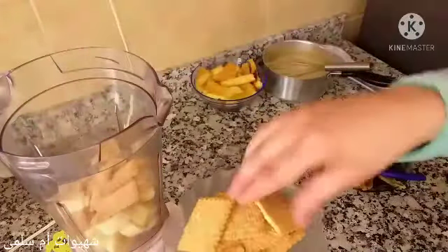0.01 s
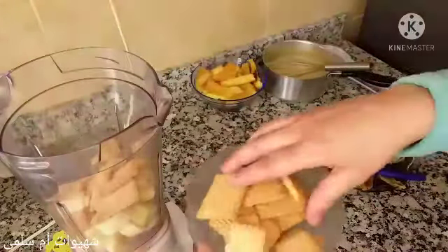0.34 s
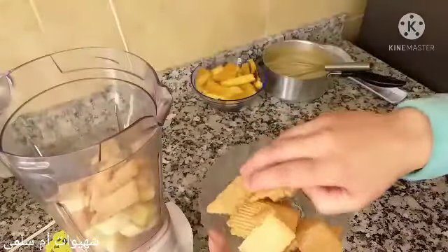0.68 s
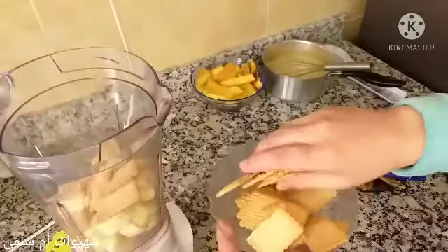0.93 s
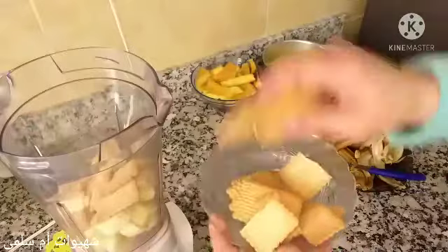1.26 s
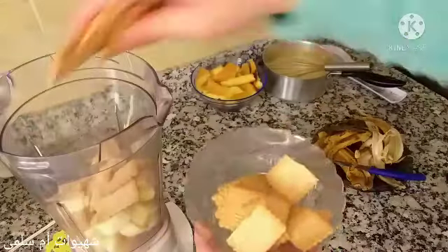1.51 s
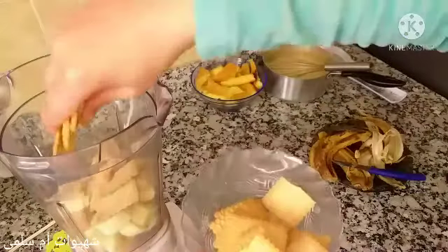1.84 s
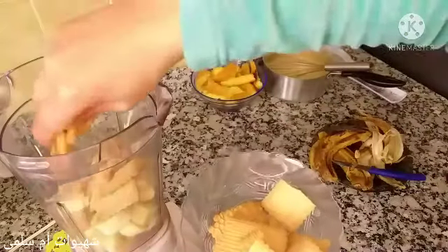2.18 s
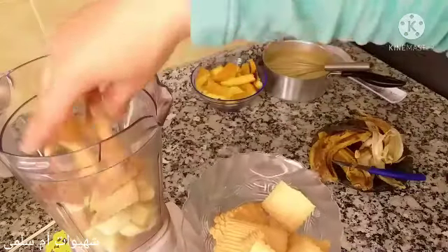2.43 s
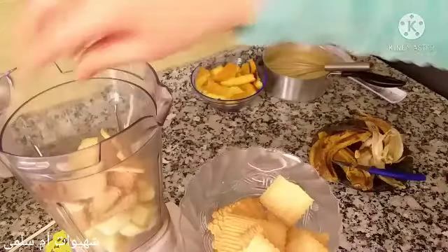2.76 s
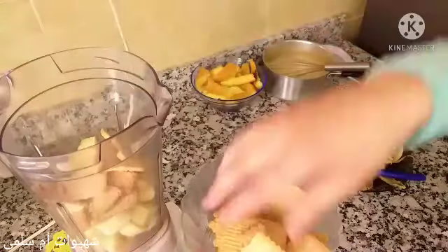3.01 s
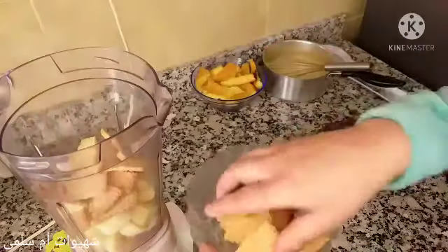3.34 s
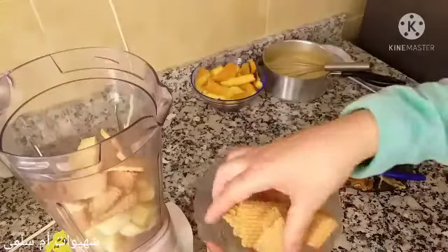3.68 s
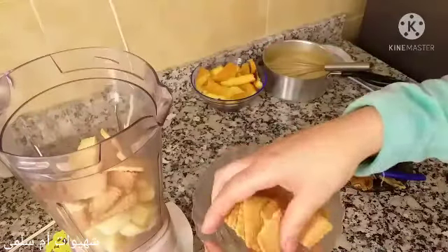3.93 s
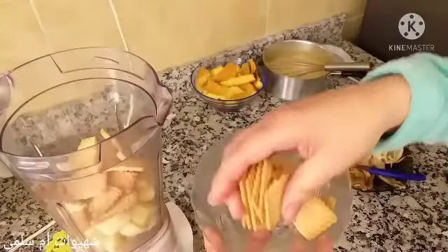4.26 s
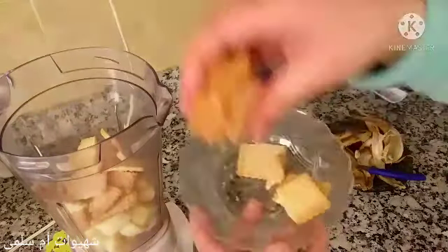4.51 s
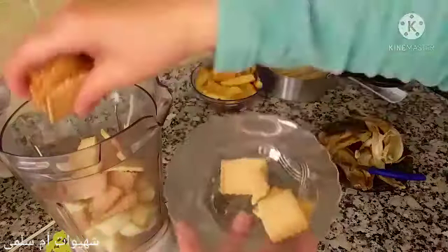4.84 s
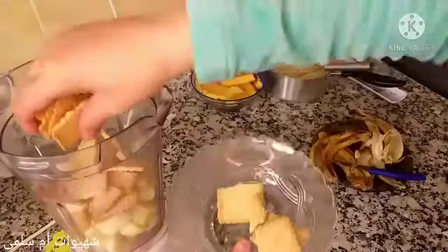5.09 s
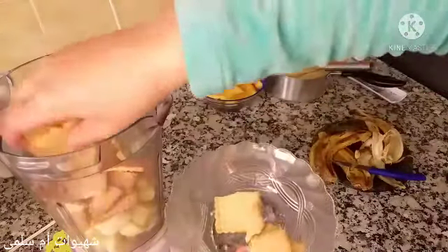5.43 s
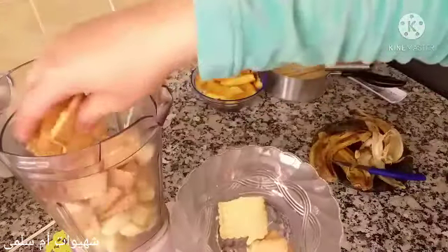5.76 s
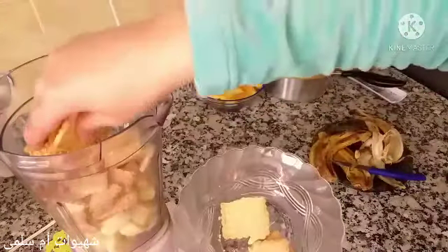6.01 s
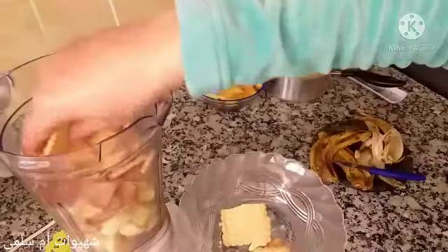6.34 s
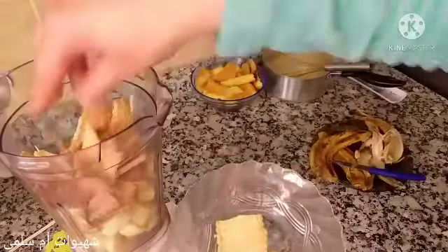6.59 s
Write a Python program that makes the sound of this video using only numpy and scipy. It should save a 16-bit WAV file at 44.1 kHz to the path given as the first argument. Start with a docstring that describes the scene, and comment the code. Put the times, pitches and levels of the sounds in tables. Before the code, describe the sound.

Dry biscuits softly slide and bump on a glass plate, with one bright clink at about 0.9 seconds. From 1.6 to 2.3 seconds they snap in a hand in a quick run of crisp, crumbly cracks. The pieces clatter and scrape into a plastic blender jar from 2.4 to 2.7 seconds, with soft low thumps from its base. Between 3.1 and 4.5 seconds more biscuits are gathered, with quiet rasping and faint ticks of glass. Snapping resumes around 4.7 seconds, with a hollow knock on the jar near 5. From 5.5 seconds pieces crunch, scrape and fall, striking the ringing plastic at 5.7 and, loudest of all, at 6.2 seconds. A few smaller bits settle until about 6.7 seconds. Everything sounds close, with a short tiled kitchen echo over a low steady hush and a faint rumble.

```python
"""Dry biscuits snap in a hand and fall into a plastic blender jar, twice, gathered from a glass plate.
Each snap or landing is a burst of tiny fractures, and rough faces rasp as they rub.
The jar's shell rings, its wall knocks and its base thumps; the plate clinks.
A tiled kitchen echoes, over a low hush and a faint rumble."""
import sys
import numpy as np
from scipy import signal
from scipy.fft import rfft, irfft
from scipy.io import wavfile

SR = 44100
rng = np.random.default_rng(int(sys.argv[2]) if len(sys.argv) > 2 else 0)


def materialize(psi):
    """Save the field psi as 16-bit PCM at rate SR to the path in sys.argv[1].

    A 1-D psi becomes a single channel; in a 2-D psi each row is a channel.
    """
    bounded = np.clip(np.atleast_2d(psi).T, -1, 1)
    quanta = np.round(bounded * 32767).astype(np.int16)
    wavfile.write(sys.argv[1], SR, quanta)


N = 294147
CLICK_TAPS = 1024

# Breaks: (time [s], level [dB], bass [dB], treble [dB], crumble [s], resonance [Hz])
SNAPS = [(1.584, -31, -5, 2.5, 0.0057, 3200), (1.603, -37.5, 2, -2, 0.0076, 7450),
         (1.7075, -31.5, -1, -7, 0.01, 3050), (1.7116, -28.5, 1, 8, 0.0023, 4670),
         (1.8485, -44, -8, 6, 0.003, 7600), (1.890, -30.5, -4, 7, 0.0049, 7100),
         (1.928, -33.5, 4, 5.5, 0.0078, 5150), (2.024, -40.5, 6, -3, 0.0065, 1500),
         (2.042, -31.5, 4.5, 3.5, 0.0078, 2310), (2.118, -36, 4, 6.5, 0.0068, 5500),
         (2.1875, -33, 0.5, 3.5, 0.0085, 5900), (2.217, -57, 0, -11, 0.0036, 2600),
         (2.295, -40.5, 1, 1, 0.009, 2400), (4.679, -49, 1.5, -2.5, 0.0034, 2320),
         (4.736, -44.5, 2, -7, 0.0036, 2560), (4.842, -29.5, -4, -1, 0.0012, 5170),
         (4.905, -32, -9, 6.5, .003, 3570), (4.946, -37, 9, -13, 0.0063, 4500),
         (4.957, -30, 10.5, 4.5, 0.0023, 2460), (5.010, -38, 5, 10, .002, 6100),
         (5.135, -41, 6.5, 6, .002, 3900), (5.174, -42, -6, -1, 0.0045, 7200),
         (5.398, -47, -4, 0, 0.0044, 7600), (5.955, -35.5, -4, -7, 0.0023, 1600),
         (5.977, -35.5, 12, -9, 0.0024, 3500), (6.005, -31.5, -2, 2, 0.001, 3500),
         (6.1315, -25.5, 5, 1.5, 0.0023, 3530), (6.155, -26, 12.5, 12, 0.0061, 1520),
         (6.225, -37, 7, -4, 0.0017, 1600)]
# Grinding of the stack: (start [s], length [s], level [dB], bass [dB])
SQUEEZES = [(1.83, .13, -42, -0.5), (1.98, 0.19, -54, 2), (2.2, 0.14, -42, -0.5), (2.4, .15, -38.5, 2),
            (2.58, 0.052, -45.5, 17.5), (4.79, .02, -49, 5), (4.885, 0.023, -43, 12),
            (5.02, 0.12, -48.5, -2), (5.25, 0.086, -57, 9), (5.35, 0.051, -48.5, -6)]
# Fracture spectrum in the hand: (frequency [Hz], level [dB])
SNAP_COLOUR = [(100, -53.5), (450, -12), (800, -21.5), (1400, -11), (2300, -7.5), (3600, -1), (5200, -3),
               (7200, -2), (8700, -18.5), (10500, -8.5), (15500, -10)]


def snapping():
    """Biscuits grind and crack between the fingers at the jar's mouth."""
    crunch = gain_of(-0.5) * bursts(SNAPS, SNAP_COLOUR, crack=2.06, per_s=7000, spread_db=2.5, lift_db=7)
    crunch += rasp(SQUEEZES, SNAP_COLOUR, level_db=-2.5, treble_db=-2.5, per_s=2500, spread_db=1.5,
                   catches_per_s=38, catch_db=14, press_s=0.0044)
    return kitchen(crunch, near_db=-3, tail_db=-3) + gain_of(-17) * jar_resonance(crunch)


# Landings: (time [s], level [dB], bass, treble [dB before shelf_scale], crumble [s before stretch],
# resonance [Hz])
DROPS = [(2.387, -20.5, 12, -7, 0.0035, 2880), (2.422, -27, 16, 10, 0.0014, 6600),
         (2.435, -25, 4, 6, 0.0029, 4200), (2.466, -24, -12, -2, 0.0028, 7450),
         (2.472, -21.5, 2, 11, 0.00047, 3900), (2.480, -22.5, 21, -5, 0.012, 1170),
         (2.5095, -25, 23, -4, 0.0026, 3000), (2.549, -29, 5, -5, 0.014, 2300),
         (2.588, -29, 24, -22, 0.0036, 1430), (2.593, -22, 11, -14, 0.0017, 1610),
         (2.686, -27.5, 4, 7, 0.0047, 2200), (5.515, -36.5, -21, 27, 0.004, 3880),
         (5.714, -24.5, 12, 3, 0.02, 1810), (5.7205, -32.5, 22, -12, .007, 1730),
         (5.738, -35, 25, 7, 0.0033, 1400), (5.765, -29, 22, 2, .004, 2220),
         (5.813, -29.5, 18, -9, 0.013, 4240), (5.858, -23, 3, 5.5, 0.0038, 4000),
         (6.161, -15.5, -3, -3, 0.0061, 7900), (6.174, -16.5, 0, -5, 0.0044, 3300),
         (6.1856, -11.5, -9, -15, 0.0055, 2850), (6.192, -16.5, 11, -16, 0.0086, 1660),
         (6.237, -19, 4, -10, 0.0027, 8100), (6.371, -33, -17, -15, 0.0025, 4280),
         (6.428, -35.5, -10, -24, 0.0061, 5100), (6.505, -32, 18, 8, 0.0042, 1860),
         (6.610, -31.5, 13, 11, 0.0039, 4440), (6.659, -35.5, 37, 15, 0.0098, 5800)]
# Strokes along wall and pile: (start [s], length [s], level [dB], bass [dB])
SCRAPES = [(2.35, 0.014, -40, 19.5), (2.44, 0.034, -28, 15), (5.41, 0.16, -50.5, 3.5), (5.5, 0.089, -37, 7),
           (5.57, 0.065, -34, 7.5), (5.67, 0.031, -34, 9), (5.71, 0.039, -27.5, -7), (5.79, 0.047, -37, 1),
           (5.87, 0.13, -42, 14), (6.02, 0.13, -45, 14), (6.135, 0.12, -26.5, 2), (6.27, 0.097, -38.5, 11),
           (6.4, 0.24, -43, 13), (6.505, 0.056, -35, 12), (6.57, .1, -45.5, -13)]
# Fracture spectrum in the jar: (frequency [Hz], level [dB])
DROP_COLOUR = [(100, -29.5), (280, -24), (460, -11.5), (720, -15.5), (1100, -6.5), (1700, -4), (2700, 4),
               (4200, 0.5), (5500, -1.5), (7200, -3.5), (8700, -21.5), (11000, -16), (15500, -21)]


def landing():
    """Pieces hit and scrape the jar and the pile in it."""
    crunch = gain_of(-3.5) * bursts(DROPS, DROP_COLOUR, crack=0.52, per_s=7600, spread_db=0, lift_db=8,
                                    stretch=1.03, shelf_scale=0.59)
    crunch += rasp(SCRAPES, DROP_COLOUR, level_db=-8, treble_db=9, per_s=3000, spread_db=3,
                   catches_per_s=31, catch_db=7.5, press_s=0.007)
    return kitchen(crunch, near_db=-2, tail_db=-3) + gain_of(-15) * jar_resonance(crunch)


# Plastic shell modes: (frequency [Hz], level [dB], T60 [s])
JAR_MODES = [(444, -9, .38), (476, -12, .22), (1224, -8, .28), (1665, -7, .15), (1750, 0, .28),
             (2392, -3, .27), (2553, -3, .25), (2846, -8, .27), (2930, -8, .2), (3040, -6, .25),
             (3302, -8, .26), (3601, -8, .25), (3681, -10, .24), (4684, -12, .22)]


def jar_resonance(crunch):
    """A crunch excites the shell's modes."""
    return convolve(crunch, ring(JAR_MODES))


# Direct hits: (time [s], peak [dB])
SHELL_HITS = [(2.389, -33), (2.591, -47), (5.721, -20.5), (6.188, -14)]


def jar_hits():
    """Pieces strike the bare shell and set it ringing."""
    return strikes(SHELL_HITS, JAR_MODES, rise_s=0.0008)


# Blows on the wall: (time [s], level [dB])
KNOCKS = [(1.712, -47.5), (2.0425, -41.5), (2.48, -41.5), (4.9575, -32.5), (5.738, -34.5), (6.133, -35),
          (6.161, -38.5), (6.61, -39.5)]
# Wall modes: (frequency [Hz], level [dB], T60 [s])
WALL_MODES = [(447, -6, 0.22), (465.3, 7, 0.12), (514, -1, 0.14), (568, -4.5, 0.054), (922, 2.5, 0.038),
              (1120, -8, 0.16)]


def wall_knocks():
    """The jar's wall rings briefly when knocked, and the room answers."""
    knocks = gain_of(5) * strikes(KNOCKS, WALL_MODES, rise_s=0.0022)
    return knocks + convolve(knocks, room_response(near_db=-9, tail_db=-10))


# Pushes: (time [s], level [dB])
THUMPS = [(2.47, -43), (2.525, -41.5), (2.6, -47.5), (4.957, -58), (5.6, -50), (5.73, -47), (5.959, -47),
          (6.165, -35.5), (6.19, -37), (6.3, -43.5), (6.52, -49)]
# Base modes: (frequency [Hz], level [dB], T60 [s])
BASE_MODES = [(62, -11, .25), (85, -16, .3), (95.3, 21, 0.63), (121.7, 2.5, .15)]


def base_thumps():
    """Soft pushes rock the blender on its base."""
    return gain_of(-7.5) * strikes(THUMPS, BASE_MODES, rise_s=0.017)


# Biscuit on biscuit: (time [s], level [dB], bass, treble [dB before shelf_scale],
# crumble [s before stretch], resonance [Hz])
NUDGES = [(.371, -39.5, 7, 7.5, 0.0034, 1560), (.472, -39.5, 2, 2, 0.0061, 1510),
          (.658, -43, 16, 0, 0.0061, 2520), (.806, -41.5, 10, -14, .002, 1700),
          (.817, -45, 12, -7, 0.0027, 1700), (1.052, -41, -5, -17, 0.0056, 1500),
          (1.103, -40.5, 2, 3.5, .006, 6000), (3.133, -38, 10, -3, 0.0029, 4570),
          (3.225, -46, -2, -10, 0.002, 2500), (3.234, -36, 0, -8, .004, 2530),
          (3.244, -43.5, 8, 27, 0.0027, 7600), (3.280, -38, 3.5, 4, 0.002, 2600),
          (3.423, -42, 5, 0, .0024, 3700), (3.490, -37, 9, 11.5, 0.0024, 3450),
          (3.534, -41, 4, 13, 0.0031, 5160), (3.614, -44.5, -8, -5, 0.0013, 3760),
          (3.744, -43.5, 8, 9.5, 0.0021, 2720), (3.8765, -35.5, -8, -15, 0.0004, 3430),
          (3.933, -39, -1, 8, 0.007, 5000), (3.966, -42, -2, 13, 0.0062, 2700),
          (4.121, -43, -8, -16, 0.0026, 3300), (4.153, -39, -7, 9.5, 0.001, 2500),
          (4.396, -41.5, -24, 8, 0.0024, 5100), (4.436, -38, -24, 5, 0.0058, 7700),
          (4.5055, -43.5, -0.5, 3, 0.0042, 5330)]
# Biscuit edge on glass: (time [s], level [dB], bass, treble [dB before shelf_scale], crumble [s],
# resonance [Hz])
CLINKS = [(.741, -44, -11, 12, 0.0053, 1820), (.8364, -41, 0, -15, 0.0071, 3480),
          (.8716, -32, -11, 1, .001, 6550), (.8938, -40.5, -6, 11, 0.0024, 6440)]
# Gathering strokes: (start [s], length [s], level [dB], bass [dB])
SLIDES = [(.18, 0.23, -56.5, 14.5), (.287, 0.03, -44.5, 8), (.32, 0.055, -43.5, 9.5),
          (.468, 0.08, -42, 6.5), (.56, 0.16, -46.5, 6), (.735, 0.15, -48, 8.5), (.88, 0.028, -46, 8),
          (1.01, 0.029, -54.5, 10.5), (1.15, 0.029, -50, 3), (1.27, 0.076, -67, 18),
          (1.35, 0.048, -63.5, 13), (1.43, 0.29, -57.5, 9.5), (3.118, 0.041, -46.5, 9.5),
          (3.24, 0.29, -48.5, 3.5), (3.452, 0.036, -42, 3.5), (3.64, 0.21, -57.5, 9),
          (3.73, 0.029, -46, 2.5), (3.85, .09, -54, 11), (3.94, 0.056, -43, 2), (4.1, 0.064, -44.5, 1),
          (4.27, 0.084, -62.5, 1), (4.37, 0.029, -45.5, -12), (4.45, 0.26, -59, 5)]
# Spectra of rubbing and of edge contact: (frequency [Hz], level [dB])
PLATE_COLOUR = [(100, -39), (400, -13), (680, -9.5), (900, -3), (1600, -2.5), (2700, 2), (4000, 3),
                (5500, -4.5), (7200, -1.5), (8800, -19.5), (12000, -12), (15500, -21)]
CLINK_COLOUR = [(150, -40), (600, -21), (1200, -7), (2400, -7.5), (3600, 2.5), (5400, -19.5), (6700, -10),
                (8200, -13), (10000, -24), (15500, -28)]


def gathering():
    """Biscuits bump, slide and clink on the glass plate."""
    rustle = gain_of(-3) * bursts(NUDGES, PLATE_COLOUR, crack=1, per_s=6000, spread_db=1, lift_db=7,
                                  stretch=3.05, shelf_scale=0.92, yield_db=-17, yield_s=0.0024)
    rustle += rasp(SLIDES, PLATE_COLOUR, level_db=-3.5, treble_db=3.5, per_s=2200, spread_db=3,
                   catches_per_s=41, catch_db=-1.5, press_s=0.014)
    clinks = gain_of(2) * bursts(CLINKS, CLINK_COLOUR, crack=5.9, per_s=22000, spread_db=15, lift_db=3,
                                 shelf_scale=0.27)
    contacts = kitchen(rustle, near_db=-8, tail_db=-3) + kitchen(clinks, near_db=-1.5, tail_db=-5)
    return contacts + plate_ring(rustle)


# Blows on the plate: (time [s], peak [dB], favoured frequency [Hz], fall-off [dB/octave])
GLASS_HITS = [(.741, -44, 8800, 24), (.8716, -24.5, 5200, 7), (3.134, -41.5, 4900, 50),
              (3.49, -44, 4900, 50), (3.8765, -40, 3600, 40), (3.966, -46, 4900, 50),
              (4.1534, -45, 4900, 50)]
# Plate modes: (frequency [Hz], level [dB], T60 [s])
GLASS_MODES = [(877, -14, .1), (1227, -12, .25), (2401, -9, .12), (2762, -8, .15), (3472, -11, .25),
               (3570, -7, .17), (3758, -4, .2), (3801, -3, .22), (4425, -12, .2), (4720, -12, .3),
               (4880, -10, .33), (6520, -7, .2), (6568, -3, .27), (6690, -5, .28), (7429, -12, .3),
               (8128, -8, .38), (8480, -12, .28), (9464, -13, .2)]


def plate_ring(rustle):
    """The glass rings faintly with the rustle; a blow favours the modes that move most at its spot."""
    out = gain_of(-21) * convolve(rustle, ring(GLASS_MODES))
    for s, db, spot_hz, fall_db in GLASS_HITS:
        modes = [(hz, level - fall_db * abs(np.log2(hz / spot_hz)), t60)
                 for hz, level, t60 in GLASS_MODES]
        out += strikes([(s, db)], modes, rise_s=0.00028)
    return out


def bursts(table, colour, crack, per_s, spread_db, lift_db, stretch=1, shelf_scale=1,
           yield_db=-15, yield_s=0.0009):
    """The crust starts to yield, a crack runs through, then fractures die away as it crumbles."""
    out = np.zeros(N)
    t = np.arange(-CLICK_TAPS // 4, 4 * CLICK_TAPS) / SR
    age = np.maximum(t, 0)
    crack_s = 0.00081
    yielding = gain_of(yield_db) * np.exp(-abs(t) / yield_s)
    for s, db, bass, treble, crumble, piece_hz in table:
        strain = np.where(t < 0, yielding, np.exp(-age / (stretch * crumble)))
        crumbling = unit(grains(len(t), per_s, spread_db) * strain)
        split = unit(rng.standard_normal(len(t)) * np.sqrt(age) * np.exp(-age / crack_s))
        force = crumbling + crack * np.exp(-crumble / 0.014) * split  # short breaks start hardest
        sound = convolve(force, click(colour, shelf_scale * bass, shelf_scale * treble, piece_hz, lift_db))
        add(out, s + t[0], gain_of(db) * sound * np.sqrt(SR / 100 / crunch_energy(sound)))
    return out


def rasp(strokes, colour, level_db, treble_db, per_s, spread_db, catches_per_s, catch_db, press_s):
    """Rough faces slide: small fractures follow the pressure and flare where a crumb catches."""
    out = np.zeros(N)
    t = np.arange(SR // 2) / SR
    sag_db_per_s, release_s, catch_s = 26.5, 0.023, 0.0019
    grip = np.minimum(t / press_s, 1) * gain_of(-sag_db_per_s * t)  # sags as the biscuits give way
    for s, length_s, db, bass_db in strokes:
        pressure = grip * np.exp(-np.maximum(t - length_s, 0) / release_s)
        catches = convolve(abs(grains(len(t), catches_per_s, spread_db=0.83)), np.exp(-t / catch_s))
        force = grains(len(t), per_s, spread_db) * (1 + gain_of(catch_db) * catches)
        sound = convolve(force, click(colour, bass_db, treble_db))
        add(out, s, gain_of(db + level_db) * pressure * sound * np.sqrt(len(t) / crunch_energy(sound)))
    return out


def grains(size, per_s, spread_db):
    """Random impulses; a wider spread makes a few much larger than the rest."""
    chance, sign, height = rng.random((3, size))
    strength = np.minimum(-np.log(height + 1e-9), 4)
    return (chance < per_s / SR) * np.sign(sign - 0.5) * gain_of(spread_db * strength)


def click(colour, bass_db, treble_db, piece_hz=3000, lift_db=0):
    """One fracture: a minimum-phase click with two shelves and the piece's broad resonance."""
    bass_hz, treble_hz, width_octaves = 1600, 7500, 0.23
    hz = abs(np.fft.fftfreq(CLICK_TAPS, 1 / SR))
    low_shelf = 1 / (1 + (hz / bass_hz) ** 4)
    high_shelf = 1 - 1 / (1 + (hz / treble_hz) ** 6)
    resonance = np.exp(-0.5 * (np.log2((hz + 1) / piece_hz) / width_octaves) ** 2)
    db = curve_at(colour, hz) + bass_db * low_shelf + treble_db * high_shelf + lift_db * resonance
    spectrum = np.exp(np.conj(signal.hilbert(np.log(gain_of(db)))))
    return np.fft.ifft(spectrum).real[:CLICK_TAPS // 2]


def strikes(table, modes, rise_s):
    """A body rings after each blow; a soft blow takes longer to set it going."""
    out = np.zeros(N)
    sound = ring(modes)
    sound *= 1 - np.exp(-np.arange(len(sound)) / SR / rise_s)
    for s, db in table:
        add(out, s, gain_of(db) * sound / abs(sound).max())
    return out


def ring(modes):
    """Response of a struck body: dying sines, energy 1."""
    t = np.arange(SR // 2) / SR
    return unit(sum(gain_of(db) * unit(np.sin(2 * np.pi * hz * t) * np.exp(-np.log(1000) * t / t60))
                    for hz, db, t60 in modes))


def kitchen(sound, near_db, tail_db):
    """Pieces sound from changing spots: adds echoes that crossfade among five sets of paths."""
    spots, step_s = 5, 0.017
    position = np.arange(N) / SR / step_s
    out = sound.copy()
    for spot in range(spots):
        distance = np.minimum(abs((position - spot) % spots - spots / 2), 1)
        out += convolve(sound * np.cos(np.pi / 2 * distance), room_response(near_db, tail_db))
    return out


# Kitchen decay: (frequency [Hz], T60 [s])
ROOM_T60 = [(150, 1), (500, 0.61), (1500, 0.46), (3000, 0.35), (6500, 0.42), (10000, 0.29), (15000, 0.34)]


def room_response(near_db, tail_db):
    """Quick reflections from jar, counter and wall, then a tail that dies faster in the treble."""
    gap_s, near_s, build_s = 0.0007, 0.0041, 0.0017
    t = np.arange(SR * 3 // 4) / SR
    near = unit(grains(len(t), per_s=5000, spread_db=4.5) * np.exp(-t / near_s) * (t > gap_s))
    hz, age, bands = signal.stft(rng.standard_normal(len(t)), SR, nperseg=256)
    bands *= np.exp(-np.log(1000) * age / curve_at(ROOM_T60, hz)[:, None])
    tail = signal.istft(bands, SR, nperseg=256)[1][:len(t)]
    tail = unit(tail * (1 - np.exp(-t / build_s)))
    return gain_of(near_db) * near + gain_of(tail_db) * tail


# Background spectra: (frequency [Hz], level [dB])
HUSH_COLOUR = [(20, -44), (50, -16.5), (95, 1), (125, -11.5), (152, 1.5), (200, -3), (310, -9),
               (550, -21.5), (1600, -15.5), (2800, -26.5), (6000, -26.5), (8500, -38.5), (15000, -28)]
RUMBLE_COLOUR = [(20, -35.5), (55, 3.5), (80, -5), (200, -55.5), (1000, -100)]
# Rumble envelope: (time [s], level [dB])
RUMBLE_LEVEL = [(0, -94), (2.3, -84), (2.7, -73), (3.6, -77), (4.4, -77), (5.0, -89), (6.67, -82)]


def hush():
    """The kitchen's low, steady hush, and a faint rumble that comes and goes."""
    air = gain_of(-64.5) * coloured_noise(HUSH_COLOUR)
    rumble_db = np.interp(np.arange(N) / SR, *np.transpose(RUMBLE_LEVEL))
    return air + gain_of(rumble_db) * coloured_noise(RUMBLE_COLOUR)


def coloured_noise(colour):
    """Noise of a given spectrum, RMS 1."""
    gain = gain_of(curve_at(colour, np.fft.rfftfreq(N, 1 / SR)))
    return np.sqrt(N) * unit(irfft(rfft(rng.standard_normal(N)) * gain, N))


def crunch_energy(x):
    """Energy in the band where a crunch is heard most."""
    band = signal.butter(4, [1800, 8000], "band", fs=SR, output="sos")
    return np.sum(signal.sosfilt(band, x) ** 2) + 1e-20


def gain_of(db):
    """Decibels to a factor."""
    return 10 ** (np.asarray(db) / 20)


def unit(x):
    """Scales to energy 1."""
    return x / np.sqrt(np.sum(x ** 2) + 1e-20)


def curve_at(points, hz):
    """Interpolates on a log-frequency axis."""
    point_hz, value = np.transpose(points)
    return np.interp(np.log(hz + 1), np.log(point_hz + 1), value)


def add(mix, s, sound):
    """Mixes a sound in at time s."""
    part = mix[max(round(s * SR), 0):][:len(sound)]
    part += sound[:len(part)]


def convolve(x, response):
    """Convolution, cut to the length of x."""
    return signal.oaconvolve(x, response)[:len(x)]


def scene():
    """Biscuits, jar and plate in one room, mono."""
    biscuits = gathering() + snapping() + landing()
    jar = jar_hits() + wall_knocks() + base_thumps()
    return (biscuits + jar + hush())[None]


def record(dry):
    """The microphone's bass roll-off and band limit."""
    low_hz, high_hz = 40, 15750
    highpass = signal.butter(2, low_hz, "high", fs=SR, output="sos")
    lowpass = signal.firwin(301, high_hz, window=("kaiser", 7), fs=SR)
    return signal.oaconvolve(signal.sosfilt(highpass, dry), lowpass[None], "same")


dry = scene()
out = record(dry)
materialize(out)
```